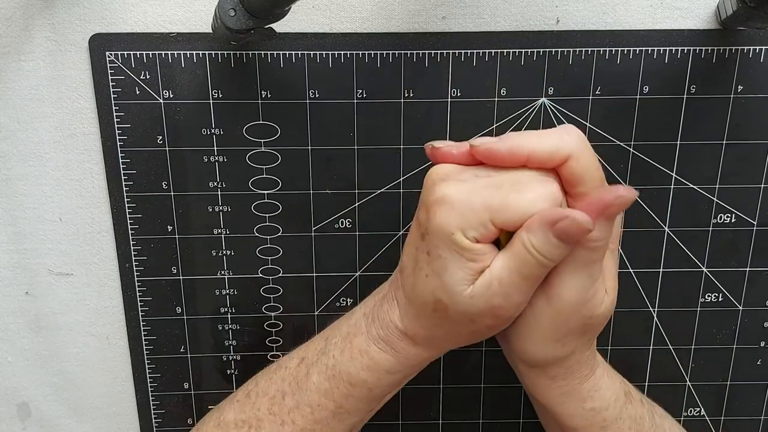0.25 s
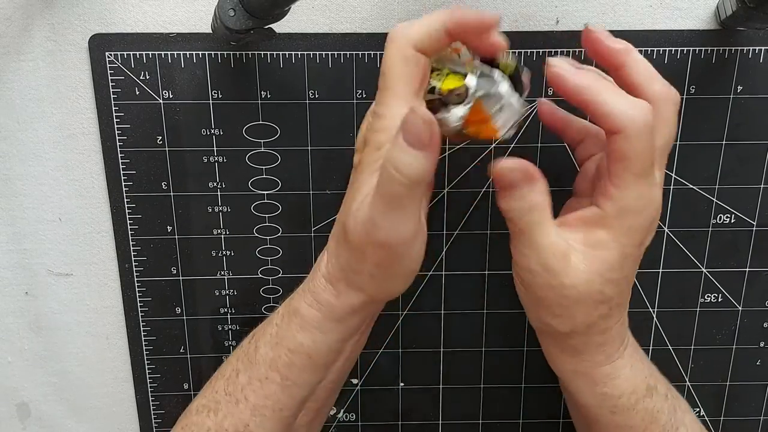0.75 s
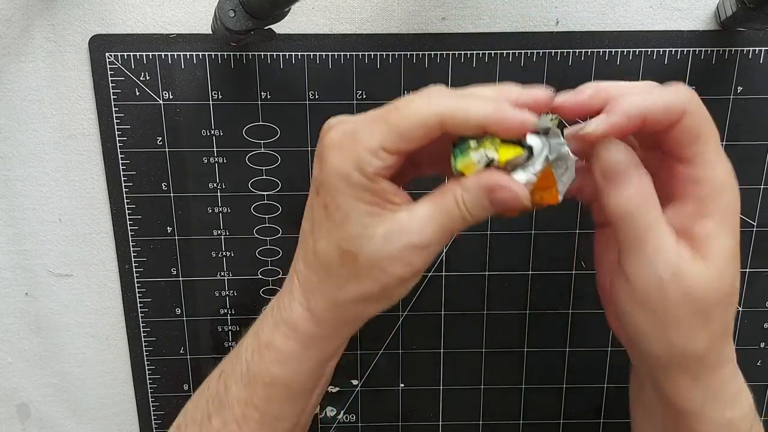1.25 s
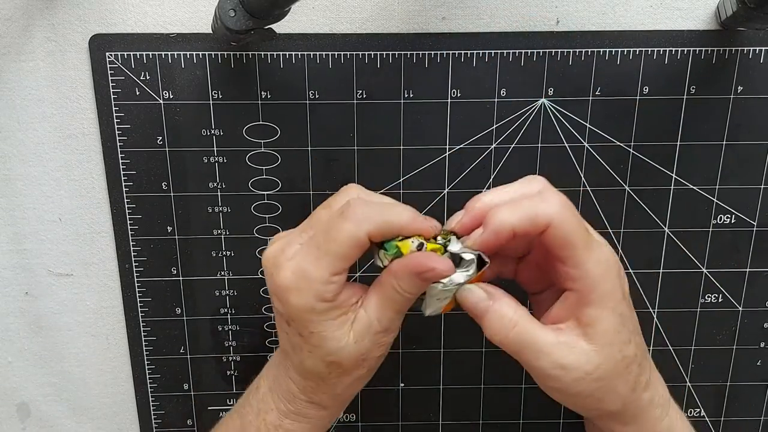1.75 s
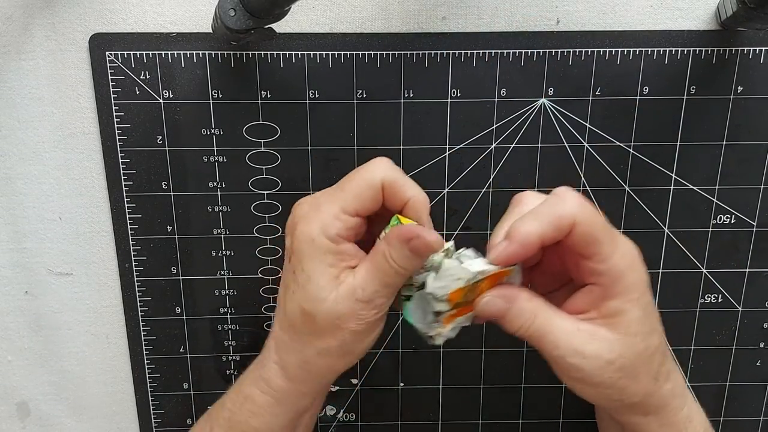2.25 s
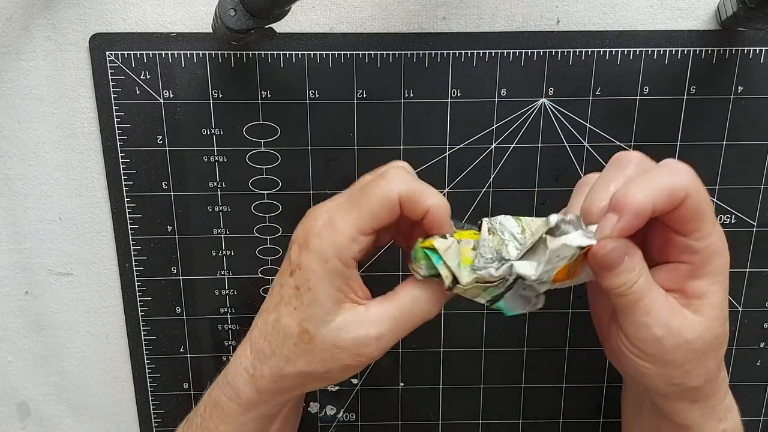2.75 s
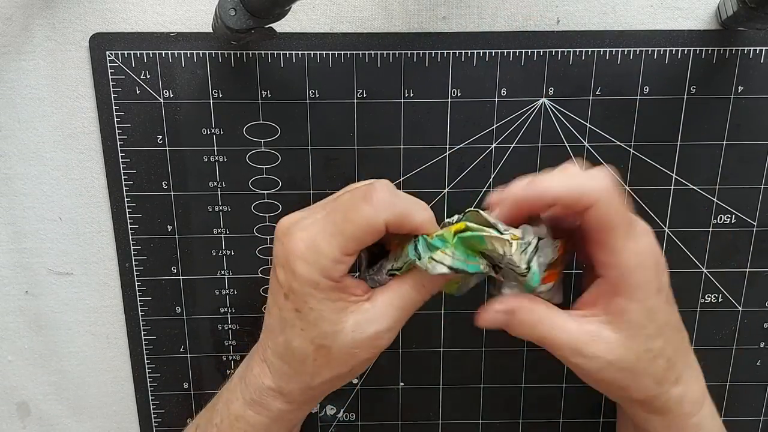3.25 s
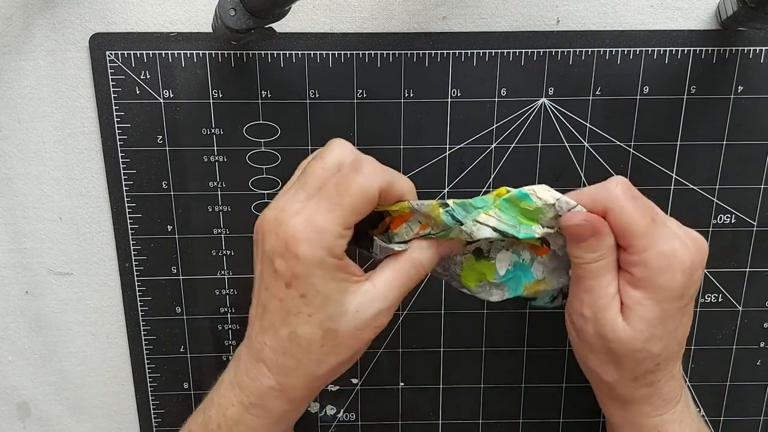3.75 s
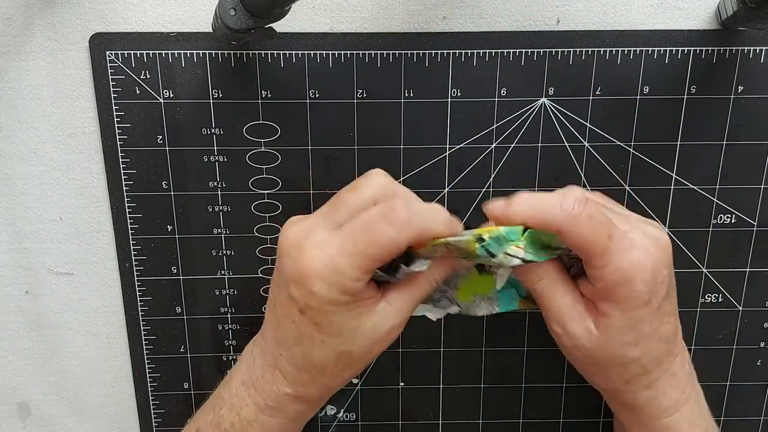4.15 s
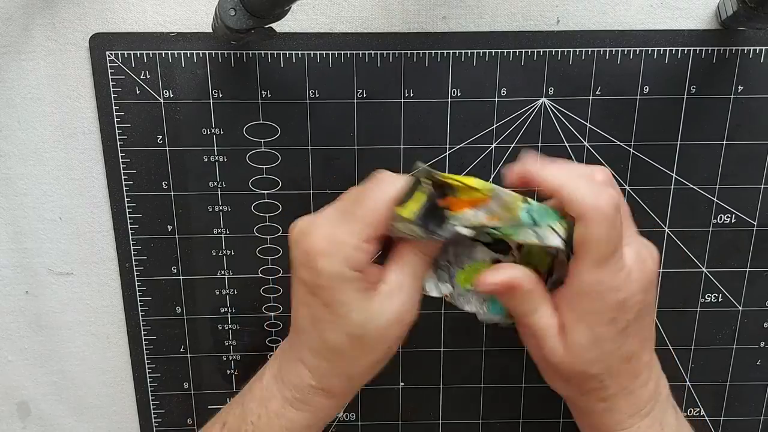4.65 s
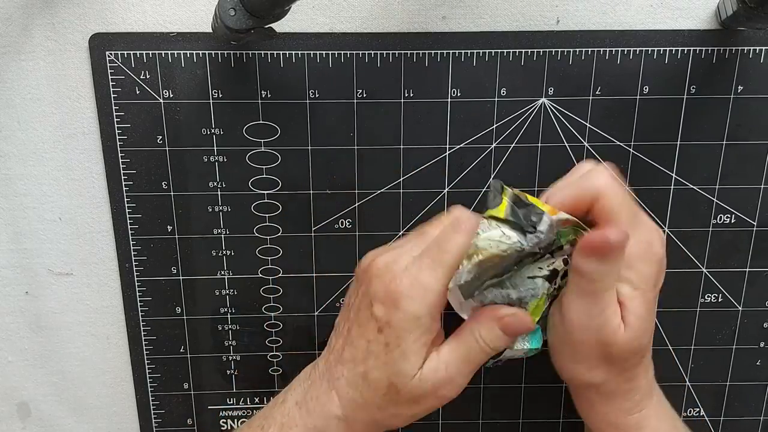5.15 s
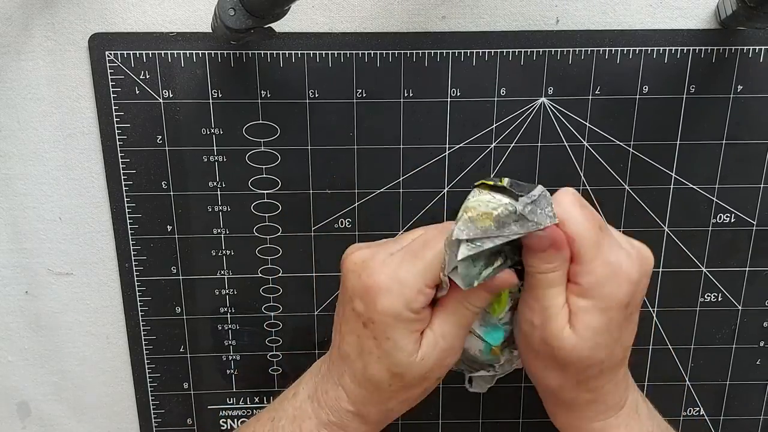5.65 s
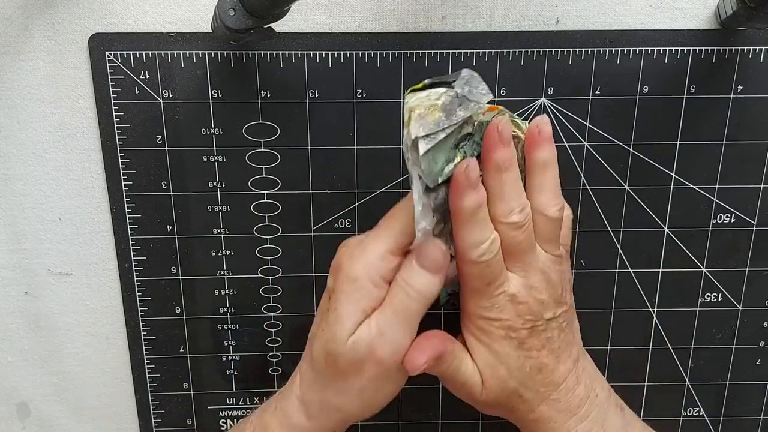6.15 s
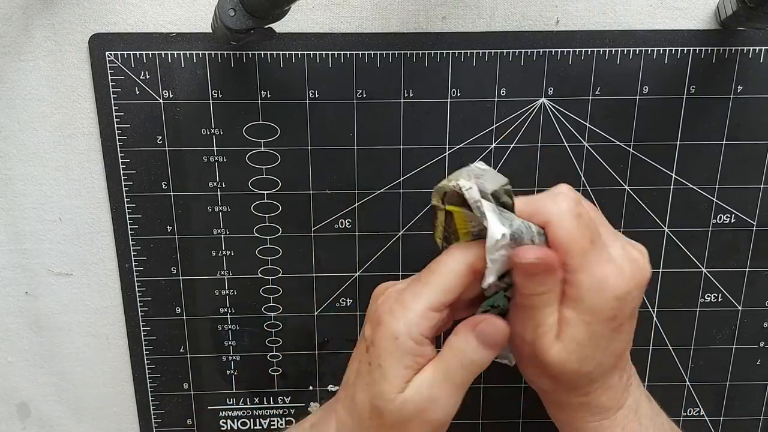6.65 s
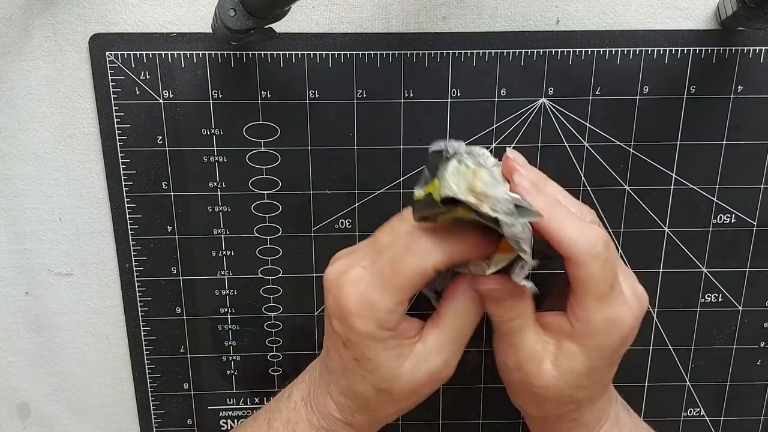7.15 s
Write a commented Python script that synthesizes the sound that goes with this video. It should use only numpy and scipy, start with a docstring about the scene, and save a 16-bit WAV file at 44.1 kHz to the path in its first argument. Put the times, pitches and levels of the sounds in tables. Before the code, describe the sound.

Two hands work a ball of stiff painted paper close to a stereo microphone in a small room. Quiet rubbing and tiny ticks come first, then scattered crackles, then a dense burst of sharp snaps and rustling as the sheet is pulled open and twisted. It eases to softer rustles with occasional pops. A low machine drone swells gently throughout.

```python
"""Stiff paper snaps and rustles close to the microphone over a machine drone that swells and sinks.
Two hands knead and unfold a ball of painted paper above a table: creases ring small panels, faces
slide over each other and the skin, fingertips tap the wad, and two squeaks chirr as partial tones.
Behind them a fan or compressor drones as noise through the low resonances of a small room.
"""
import sys
import numpy as np
from scipy import signal
from scipy.fft import rfft, irfft, next_fast_len
from scipy.io import wavfile
from scipy.ndimage import uniform_filter1d, map_coordinates

SR = 44100
rng = np.random.default_rng(int(sys.argv[2]) if len(sys.argv) > 2 else 0)


def persist_wave(psi):
    """Save psi, clipped to +-1, as 16-bit WAV."""
    counts = np.round(np.clip(psi, -1, 1) * 32767).astype(np.int16)
    wavfile.write(sys.argv[1], SR, np.atleast_2d(counts).T)


N = 326825  # samples


def amp(db):
    """Turn dB into gain."""
    return 10 ** (np.asarray(db) / 20)


def unit(x):
    """Scale a signal to rms 1."""
    return x / np.sqrt(np.mean(x ** 2) + 1e-20)


def along(points, hz):
    """Read a curve of (frequency, value) points on a log frequency axis."""
    point_hz, value = np.transpose(points)
    return np.interp(np.log(hz + 1), np.log(point_hz + 1), value)


def curves(rows):
    """Give one value per sample for each column after the time."""
    time_s, *columns = np.transpose(rows)
    return [np.interp(np.arange(N) / SR, time_s, column) for column in columns]


def wobble(rate):
    """Draw a smooth random curve through rate knots a second."""
    knots = rng.standard_normal(int(N * rate / SR) + 4)
    return map_coordinates(knots, [np.arange(N) * rate / SR])


def filtered(x, response):
    """Multiply the spectrum of x by a response of frequency."""
    size = next_fast_len(N + SR // 2)
    hz = np.fft.rfftfreq(size, 1 / SR)
    return irfft(rfft(x, size) * response(hz), size)[..., :N]


# Left-right likeness of the background noise: hz [Hz], likeness [0 to 1]
LIKENESS = [(50, 0.89), (120, 1), (200, 0.92), (400, 0.5), (1000, 0.02), (3000, 0.024), (12000, 0.038)]


def diffuse(gain):
    """Make stereo noise of rms 1 from all around: alike in the bass, almost unrelated in the treble."""
    def mid_side_gain(hz):
        angle = np.arccos(np.clip(along(LIKENESS, hz), -1, 1)) / 2
        return gain(hz) * np.array([np.cos(angle), np.sin(angle)])

    mid, side = filtered(rng.standard_normal((2, N)), mid_side_gain)
    return unit(np.array([mid + side, mid - side]))


# Low resonances of the small room: pitch_hz [Hz], width_hz [Hz], relative level_db [dB]
RESONANCES = [(48, 10, 0), (59, 9.6, 3), (71.4, 7, -5.5), (90, 5.7, -4.5), (123, 24, -9.5),
              (139.7, 13.8, -3.5), (162.7, 11.5, -7), (188.5, 11.5, -12.5), (212.4, 10.5, -17.5),
              (233, 20, -27.5), (265.6, 20, -24), (302.4, 15, -20), (332, 12, -25), (357.4, 6, -19.5)]
# Colour of moving air and microphone hiss, heard above 190 Hz: hz [Hz], relative level_db [dB per Hz]
AIR_COLOUR = [(18, -43), (30, -13), (109, -1), (135, -2.5), (248, -16.5), (350, -17.5), (432, -22.5),
              (506, -20.5), (1660, -27.5), (2000, -25), (3570, -42), (4180, -45), (12000, -40),
              (14800, -52), (16500, -68)]
# Level of the deepest hum: time_s [s], level_db [dB]
DEEP_LEVEL = [(0, -61), (1.7, -61), (2.1, -56), (2.6, -59), (3.1, -60), (4.3, -61), (5.2, -61.5),
              (7.41, -59)]
# Swell of the drone and air about their set levels: time_s [s], change_db [dB]
SWELL = [(0, 1), (0.3, -0.5), (1.3, 2.5), (1.7, 0.5), (2.6, 2), (3.3, 1), (4.5, 1.5), (5.3, -0.5), (5.6, 0),
         (7.41, 0)]
DRONE_DB, AIR_DB = -51, -60  # before the swell


def drone():
    """Machine noise excites narrow room resonances, with broad air noise and a mains-related hum."""
    (deep_db,), (swell_db,) = curves(DEEP_LEVEL), curves(SWELL)

    def resonant_noise(rows):
        def response(f):
            power = sum(amp(2 * db) / (1 + (2 * (f - hz) / width) ** 4) for hz, width, db in rows)
            return np.sqrt(power)
        return diffuse(response)

    deep = resonant_noise([row for row in RESONANCES if row[0] < 65])
    main = resonant_noise([row for row in RESONANCES if row[0] >= 65])
    air = diffuse(lambda f: amp(along(AIR_COLOUR, f)) * (f > 190))
    drift = 0.47 * wobble(2.88)  # radians
    hum = amp(-50) * np.sin(2 * np.pi * 120 * np.arange(N) / SR + drift)  # twice the mains
    noise = amp(deep_db) * deep + amp(DRONE_DB + swell_db) * main + amp(AIR_DB + swell_db) * air
    return noise + hum


# Strokes of the sheet over itself and the skin, before the rustle trims:
# loudest_s [s], rise_s [s], fall_s [s], level_db [dB], brightness_db [dB, treble over body]
SHEET_STROKES = [(0.0, 0.018, 0.061, -73, 6.5), (0.08, 0.054, 0.15, -65, -22),
                 (0.66, 0.094, 0.098, -66.5, 7), (1.01, 0.14, 0.21, -58.5, -9.5),
                 (1.222, 0.077, 0.12, -50.5, 0.5), (1.45, 0.082, 0.2, -59, -7),
                 (1.73, 0.065, 0.058, -61.5, 2), (1.88, 0.046, 0.013, -53, -6),
                 (1.94, 0.05, 0.066, -55, -2), (2.14, 0.053, 0.027, -60, -11),
                 (2.32, 0.013, 0.018, -75, 10), (2.41, 0.016, .06, -60, -5), (2.54, 0.15, 0.27, -59, -7),
                 (2.77, 0.055, 0.09, -51.5, 0.5), (2.935, 0.036, 0.062, -53.5, 0),
                 (3.079, 0.016, 0.17, -46, 1.5), (3.138, 0.049, 0.025, -48.5, 7),
                 (3.29, 0.22, 0.033, -56, 0.5), (3.39, 0.041, 0.17, -49.5, -5.5),
                 (3.44, .05, 0.044, -50, -6), (3.485, 0.038, 0.12, -48.5, 0.5),
                 (3.54, 0.036, 0.029, -48.5, -4), (3.59, 0.024, 0.051, -54.5, 5.5),
                 (3.72, 0.061, 0.077, -52.5, 0.5), (3.871, 0.021, 0.051, -44, -3),
                 (3.919, 0.021, 0.024, -38.5, -9.5), (4.005, .008, .04, -50, -3),
                 (4.035, 0.017, 0.03, -47, -2), (4.055, 0.043, 0.067, -41.5, -5),
                 (4.169, 0.13, 0.008, -54, 6), (4.29, 0.18, 0.12, -51, -1.5),
                 (4.46, 0.038, 0.038, -54.5, 2.5), (4.57, 0.11, 0.11, -53.5, -2),
                 (4.61, .02, 0.054, -61, -8), (4.7, 0.032, 0.17, -47.5, -1),
                 (4.87, 0.13, 0.094, -46.5, -10.5), (5.24, 0.18, 0.1, -53, -3.5),
                 (5.44, 0.082, 0.64, -53.5, -6.5), (5.63, 0.093, 0.093, -51, -6.5),
                 (5.8, 0.068, 0.13, -52, -7.5), (5.88, 0.025, 0.049, -50, 2),
                 (5.94, 0.039, 0.12, -52.5, -4.5), (6.175, 0.044, 0.093, -48.5, -5.5),
                 (6.46, 0.14, 0.21, -63.5, 0), (6.611, 0.042, 0.21, -56, -4), (6.95, 0.15, .08, -53, -2.5),
                 (7.18, 0.033, 0.074, -53.5, -5), (7.29, 0.059, 0.3, -60.5, 0)]
# The wad shifting between strokes, before the rustle trims:
# time_s [s], level_db [dB], brightness_db [dB, treble over body]
WAD_HOLD = [(0, -67.5, -11.5), (0.9, -70, -5.5), (1.6, -65.5, -13), (2.1, -66, -2), (2.7, -66, -6.5),
            (3.35, -59, -9), (3.8, -59, -2.5), (4.4, -59.5, -6), (5.0, -62.5, -2), (5.7, -62, -6.5),
            (6.1, -62, -9.5), (6.8, -65, -9), (7.41, -62.5, -10)]
EDGE_DB, ROUND = 17.5, 1.6  # lost over one rise or fall; 1 = pointed top, 2 = round


def handling():
    """Give the rustle's body and treble gains: stroke energies add to the hold between them."""
    hold_db, hold_bright_db = curves(WAD_HOLD)
    t = np.arange(0, N, 32) / SR  # a coarse grid is enough
    loudest_s, rise_s, fall_s, level_db, bright_db = np.transpose(SHEET_STROKES)[:, :, None]
    distance = np.abs(t - loudest_s) / np.where(t < loudest_s, rise_s, fall_s)
    stroke_db = level_db - EDGE_DB * distance ** ROUND

    def stroke_energy(db):
        return np.interp(np.arange(N) / SR, t, amp(2 * db).sum(axis=0))

    body = stroke_energy(stroke_db) + amp(2 * hold_db)
    treble = stroke_energy(stroke_db + bright_db) + amp(2 * (hold_db + hold_bright_db))
    return np.sqrt(body), np.sqrt(treble)


# Colour of the rustle's body: hz [Hz], relative level_db [dB per Hz]
BODY_COLOUR = [(180, -41), (300, 2), (428, -11), (932, 5), (1250, -0.5), (1730, 5), (2820, 1.5), (3050, -8),
               (3600, -9.5), (4300, -8.5), (5000, -12.5), (7000, -22), (9100, -56), (15400, -120)]
# Colour of the rustle's treble: hz [Hz], relative level_db [dB per Hz]
TREBLE_COLOUR = [(2350, -6.5), (4000, 0), (8100, -6), (9230, -2), (13300, -4.5), (15600, -17), (16200, 5),
                 (16500, -49)]
# Width of near sounds at the microphone: hz [Hz], side_db [dB, response of side over mid]
NEAR_WIDTH = [(200, -30), (700, -9), (2000, -4.5), (5000, -0.5), (14000, 1)]


def rustle():
    """Sheet faces slide as patchy noise while countless tiny buckles each pop at their own pitch."""
    body_gain, treble_gain = handling()
    spectrum = signal.stft(rng.standard_normal((2, N)), nperseg=256)[2]
    patches = uniform_filter1d(rng.standard_normal(spectrum.shape[1:]), 7, 0)
    patches = unit(uniform_filter1d(patches, 4, 1))
    slide = unit(signal.istft(spectrum * amp(2.0 * patches), nperseg=256)[1][:, :N])

    buckles = round(2300 * N / SR)  # 2300 a second
    when, pitch, size, place = rng.uniform(size=(buckles, 4)).T
    hz = 500 * amp(29 * pitch)[:, None]
    step = np.arange(SR // 200)
    grains = np.sin(2 * np.pi * hz * step / SR) * np.exp(-hz * step / SR / 1.06)  # a cycle or two
    size_db = -3.5 * np.log(size + .008)  # many small, few large
    # short high buckles carry as much energy as long low ones
    grains *= np.sqrt(hz) * amp(size_db)[:, None]
    at = ((when * N).astype(int)[:, None] + step).ravel()

    def scatter(weight):
        return unit(np.bincount(at, (grains * weight[:, None]).ravel(), N + SR)[:N])

    pops = np.array([scatter(np.ones(len(place))), scatter(2 * place - 1)])  # mid, side
    rough = slide + amp(-7.0) * pops

    def coloured(colour):
        return unit(filtered(rough, lambda f: amp(along(colour, f)) * amp([0 * f, along(NEAR_WIDTH, f)])))

    body = amp(-8.0) * body_gain * coloured(BODY_COLOUR)
    treble = amp(-2.0) * treble_gain * coloured(TREBLE_COLOUR)
    clumps_db = 0.11 * wobble(30) + 1.68 * wobble(90)
    mid, side = amp(clumps_db) * (body + treble)
    return np.array([mid + side, mid - side])


def ports(x):
    """Two microphone ports hear a near source by paths differing over milliseconds, new at each call."""
    t = np.arange(SR // 200) / SR
    paths = rng.standard_normal(len(t)) * amp(-60 * t / 0.0042)
    side = amp(-1.5) * np.convolve(x, paths / np.linalg.norm(paths))[:len(x)]
    width = amp(along(NEAR_WIDTH, np.fft.rfftfreq(len(x), 1 / SR)))
    side = irfft(rfft(side) * width, len(x))
    return np.array([x + side, x - side])


# Creases giving way, levels before the trims below: start_s [s], large_pitch_hz [Hz],
# large_level_db [dB], small_pitch_hz [Hz], small_level_db [dB], crack_level_db [dB]
CREASES = [(0.097, 1600, -51, 4270, -49, -79), (0.41, 720, -47.5, 1600, -69, -65),
           (0.58, 900, -68, 6500, -58, -60), (0.605, 900, -64, 3000, -60, -56),
           (0.647, 575, -61, 2640, -48, -49), (0.6555, 550, -73, 3090, -51, -47),
           (0.6635, 1010, -70, 1840, -49, -47.5), (0.7262, 700, -67, 4200, -57, -57),
           (0.794, 1110, -70, 9800, -43, -60), (0.832, 510, -66, 2030, -56, -49.5),
           (0.9219, 720, -49, 1630, -50, -69), (1.047, 2650, -42.5, 3240, -37, -55),
           (1.0475, 3830, -47, 5700, -61, -62), (1.1916, 513, -49, 1640, -63, -44),
           (1.2255, 636, -46, 4100, -50, -45), (1.2498, 1560, -58, 1570, -57, -43),
           (1.4328, 1560, -55, 3520, -47, -47), (1.671, 1370, -51, 2220, -49.5, -53),
           (1.719, 2340, -51, 5600, -50, -55), (1.734, 1470, -47, 3000, -40.5, -44),
           (1.9274, 1520, -36.5, 2030, -34, -39), (1.9694, 1550, -67, 1610, -58, -47),
           (1.9903, 1380, -63, 1940, -49, -47), (2.219, 1120, -56, 3840, -51, -52.5),
           (2.4018, 1580, -56, 1640, -51, -52), (2.4274, 560, -55, 2010, -46, -55),
           (2.474, 1550, -54, 2620, -41, -47.5), (2.7541, 1090, -35, 3600, -33, -40),
           (2.7624, 950, -38, 2250, -28, -35.5), (2.7806, 1580, -45, 10900, -29, -39),
           (2.8097, 970, -44, 7260, -36, -43), (2.932, 880, -52, 1820, -46, -37),
           (2.954, 900, -46, 1600, -52, -56), (3.063, 910, -55, 1890, -46, -61),
           (3.0723, 1160, -59, 1980, -38, -52), (3.104, 1880, -40, 3300, -34, -52),
           (3.118, 2010, -44, 3500, -38, -52), (3.1332, 855, -37.5, 2860, -28, -33),
           (3.146, 900, -53, 2900, -38, -50), (3.2479, 1000, -44.5, 5060, -35, -42),
           (3.276, 990, -49, 1700, -55, -60), (3.2882, 740, -51, 2680, -63, -43),
           (3.297, 1400, -52, 2050, -40, -49), (3.3, 583, -54, 1910, -39, -41),
           (3.369, 920, -47, 2840, -36, -46), (3.4295, 1000, -66, 5300, -52, -55),
           (3.4509, 1400, -60, 3020, -34, -58), (3.4757, 1450, -67, 2710, -36, -44),
           (3.4813, 1510, -62, 3050, -37, -39), (3.5422, 1130, -46, 2600, -52, -44),
           (3.57, 2340, -35, 2470, -25, -33.5), (3.5712, 820, -32.5, 1490, -28, -38),
           (3.5762, 1500, -48, 2310, -42, -33.5), (3.5786, 905, -48, 2280, -49, -40),
           (3.664, 1060, -36.5, 1860, -35.5, -41.5), (3.719, 1050, -49, 2530, -43, -49),
           (3.8683, 780, -59, 4070, -42, -58), (3.9095, 1510, -49, 3000, -33, -55),
           (3.9128, 1300, -29, 4200, -31, -32), (3.914, 1800, -34, 3270, -33, -48),
           (3.9443, 950, -43, 3150, -25, -52), (3.9947, 1470, -47, 2970, -40, -53),
           (3.997, 1630, -33, 3300, -21.5, -34.5), (4.03, 1190, -56, 2120, -34, -55),
           (4.035, 2100, -41, 4200, -45, -58), (4.042, 2500, -44, 4300, -40, -55),
           (4.0495, 2340, -35, 4400, -42, -55), (4.0574, 1830, -33, 4080, -27.5, -34),
           (4.0598, 960, -35, 2800, -30, -37), (4.1491, 880, -40, 2720, -33.5, -44),
           (4.2376, 950, -34.5, 2420, -41.5, -40), (4.276, 970, -45, 4330, -43, -41),
           (4.294, 990, -36.5, 2480, -31, -39), (4.4136, 750, -43.5, 2680, -46.5, -63),
           (4.58, 930, -23.5, 2200, -25, -32), (4.5803, 1630, -33.5, 2700, -32, -47),
           (4.5897, 587, -38, 2860, -30, -38), (4.596, 483, -40, 1690, -50, -55),
           (4.602, 590, -39, 2300, -54, -55), (4.617, 510, -43, 2300, -48, -54),
           (4.6916, 590, -36, 2600, -36, -45), (4.752, 920, -35, 1700, -34.5, -39.5),
           (4.7684, 1260, -41, 2440, -40, -43), (4.8557, 1410, -38, 2180, -37.5, -53),
           (4.876, 1020, -38.5, 1920, -48, -61), (4.9042, 940, -40, 1920, -54, -52),
           (5.1374, 865, -46, 1830, -55, -63), (5.2427, 990, -45, 2080, -46, -54),
           (5.2632, 1050, -46, 2230, -49, -50), (5.315, 1500, -59, 2080, -44, -62),
           (5.4105, 1030, -46.5, 1740, -49, -55), (5.445, 1450, -59, 9300, -41, -43.5),
           (5.579, 930, -52, 4530, -63, -46.5), (5.617, 517, -45.5, 4180, -40, -61),
           (5.65, 1003, -32.5, 2640, -45, -56), (5.6562, 2320, -54, 4560, -34.5, -42.5),
           (5.6695, 1280, -44, 2110, -43, -46), (5.6806, 1290, -50, 5200, -38.5, -50),
           (5.768, 1030, -49.5, 2260, -53, -60), (5.778, 906, -62, 9000, -47, -58),
           (5.8163, 840, -53, 10700, -36, -44), (5.8403, 830, -46, 2310, -46.5, -57),
           (5.8728, 1340, -42, 2420, -43, -52), (5.877, 2300, -44, 4500, -37, -43),
           (5.9046, 580, -67, 2350, -42, -48), (5.9325, 915, -44.5, 2670, -36, -48),
           (5.939, 1885, -43.5, 2720, -44, -60), (6.0454, 820, -64, 3500, -57, -62),
           (6.068, 560, -70, 2480, -51, -78), (6.1736, 1000, -46.5, 3040, -36, -45),
           (6.9618, 860, -44.5, 2660, -43, -46), (7.0958, 1350, -51, 2220, -45.5, -62),
           (7.182, 520, -65, 2050, -45, -58), (7.2769, 1140, -46, 3700, -44.5, -58)]
RING_CYCLES, CLICK_CYCLES = 19.7, 5  # cycles in which the small panel and its flick lose 60 dB
CLICK_DELAY_S = .0005  # the flick follows the first give of the crease
PANEL_NOISE_DB = -11  # noise under a panel's ring, before its panel's level
STRAIN_DB, STRAIN_S = -21, .03  # end level of the crackle before a snap; time to grow 60 dB
FLURRY_DB = -13.5  # the dying flurry, before its band trims


def snaps():
    """Each crease strains, rings a large and a small panel, cracks and sets off a dying flurry."""
    out = np.zeros((2, N + SR))
    t = np.arange(next_fast_len(SR // 11)) / SR
    lead = SR // 50  # samples of strain before the snap

    def band(x, lo_hz, hi_hz):
        sos = signal.butter(2, [lo_hz, hi_hz], "band", fs=SR, output="sos")
        return unit(signal.sosfilt(sos, x))

    def ring(hz, t60):
        return np.sin(2 * np.pi * hz * t) * amp(-60 * t / t60)

    for start_s, low_hz, low_db, mid_hz, mid_db, crack_db in CREASES:
        noise, near = rng.standard_normal((3, len(t))), rng.uniform(size=2)
        low = band(noise[0], 330, 1400)
        mid = band(noise[1], 0.51 * mid_hz, 1.46 * mid_hz)
        high = band(noise[2], 2660, 13600)
        small_t60 = RING_CYCLES / mid_hz

        large = ring(low_hz, 0.015)
        large += amp(-10) * ring(low_hz * (0.568 + 0.079 * near[0]), 0.013)
        large += amp(PANEL_NOISE_DB - 1.5 - 60 * t / 0.0086) * low
        large *= amp(low_db + 6.0) * (1 - np.exp(-t / 0.00051))

        small = ring(mid_hz, small_t60)
        small += amp(-4) * ring(mid_hz * (1.3 + 0.55 * near[1]), 0.002)
        small += amp(PANEL_NOISE_DB - 60 * t / small_t60) * mid
        small *= amp(mid_db + 5.5) * (1 - np.exp(-t * mid_hz / 1.6))

        flick = np.roll(ring(1.12 * mid_hz, CLICK_CYCLES / mid_hz), round(CLICK_DELAY_S * SR))
        flick *= amp(mid_db + 2.5)
        crack = amp(crack_db + 2.5 - 60 * t / 0.0099) * high * (1 - np.exp(-t / 0.00021))

        flurry = amp(low_db + 1.5) * low + amp(mid_db - 0.5) * mid + amp(crack_db - 5.0) * high
        flurry *= amp(FLURRY_DB - 60 * t / 0.081) * (1 - np.exp(-t / 0.0046))

        crackle = amp(low_db) * low + amp(mid_db) * mid + amp(crack_db) * high
        strain = amp(STRAIN_DB - 60 * t[:lead] / STRAIN_S) * crackle[-lead:]
        snap = large + small + flick + crack + flurry
        whole = np.concatenate([strain[::-1], snap[:-lead]])  # reversed, the strain grows
        out[:, round(start_s * SR) - lead:][:, :len(t)] += ports(whole)
    return out[:, :N]


# Fingertips landing on the wad: start_s [s], level_db [dB, before onset and decay], pitch_hz [Hz]
FINGERTIPS = [(0.924, -38, 198), (1.248, -35.5, 204), (1.912, -44, 300), (3.128, -38, 324),
              (4.575, -39, 403), (5.604, -39, 184)]


def taps():
    """A fingertip gives the wad a soft low push that dies in a few cycles."""
    out, t = np.zeros(N + SR), np.arange(SR // 10) / SR
    for start_s, level_db, pitch_hz in FINGERTIPS:
        push = np.sin(2 * np.pi * pitch_hz * t) * (1 - np.exp(-t / 0.00096))
        out[round(start_s * SR):][:len(t)] += amp(level_db - 60 * t / 0.063) * push
    return out[:N]


# Skin dragging over paint: start_s [s], length_s [s], pitch_hz [Hz, mid-squeak before scatter],
# level_db [dB, before flicker], second_db and third_db [dB over first partial], scatter [share of pitch]
SKIN_DRAGS = [(0.957, 0.065, 1680, -56.5, -10, -19, .03), (3.068, 0.026, 2086, -42.5, -13, -2, .09)]
SQUEAK_SAG, SQUEAK_FLICKER_DB = .08, 5.5  # share of pitch lost at both ends; level scatter


def squeaks():
    """Fast uneven slips make a pitch and two overtones, arched in pitch and level under random scatter."""
    out, waver = np.zeros(N), wobble(500)
    flicker = [wobble(300) for _ in range(3)]
    for start_s, length_s, pitch_hz, level_db, second_db, third_db, scatter in SKIN_DRAGS:
        arch = np.sin(np.pi * np.clip((np.arange(N) / SR - start_s) / length_s, 0, 1))
        hz = pitch_hz * (1 - SQUEAK_SAG * (1 - arch) + scatter * waver)
        phase = 2 * np.pi * np.cumsum(hz) / SR
        for k, part_db in enumerate((0, second_db, third_db)):
            gain = amp(level_db + part_db + SQUEAK_FLICKER_DB * flicker[k])
            out += gain * arch * np.sin((k + 1) * phase)
    return out


# Decay of the small room: hz [Hz], t60_s [s]
ROOM_DECAY = [(300, 0.63), (2000, 0.43), (12000, 0.32)]


def room(x):
    """The room answers with a stereo noise tail whose frequencies die at their own speeds."""
    hz, t, spectrum = signal.stft(rng.standard_normal((2, SR // 2)), SR, nperseg=256)
    decay = amp(-60 * t / along(ROOM_DECAY, hz)[:, None])
    tail = signal.istft(spectrum * decay, SR, nperseg=256)[1]
    late = np.pad(x, (250, 0))[None]  # 250 samples of delay
    return signal.fftconvolve(late, tail / np.linalg.norm(tail[0]), axes=1)[:, :N]


def scene():
    """Set the paper close to the microphone, with the room and its drone behind."""
    background = drone()
    paper = rustle() + snaps() + taps() + squeaks()
    wet = amp(-8.0) * room(paper.mean(axis=0))
    return paper + wet + background


# Colour difference of the microphone ports: hz [Hz], left_minus_right_db [dB]
PORT_COLOUR = [(60, 0), (180, 0), (550, 1.5), (1650, 1.5), (4970, -1), (15000, 2.5)]
TOP_HZ = 15900  # band limit


def record(dry):
    """The two microphone ports differ a little in colour and pass nothing above the band limit."""
    def response(hz):
        return amp(np.outer([.5, -.5], along(PORT_COLOUR, hz))) * (hz < TOP_HZ)

    return filtered(dry, response)


dry = scene()
out = record(dry)
persist_wave(out)
```